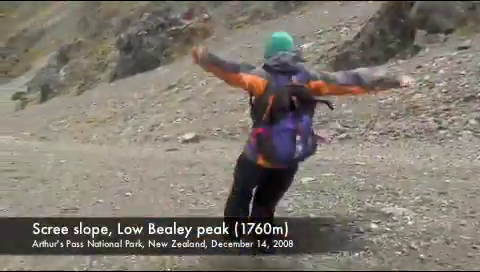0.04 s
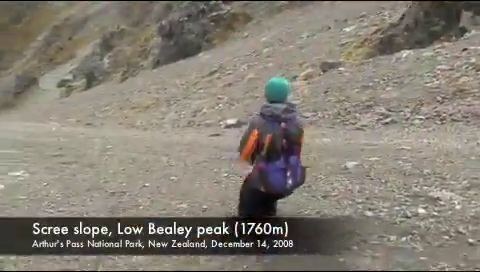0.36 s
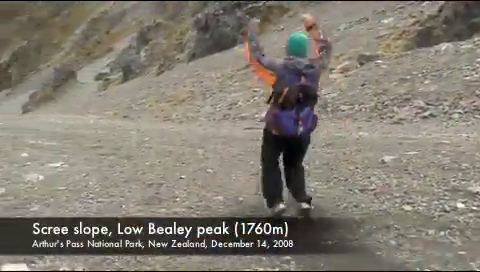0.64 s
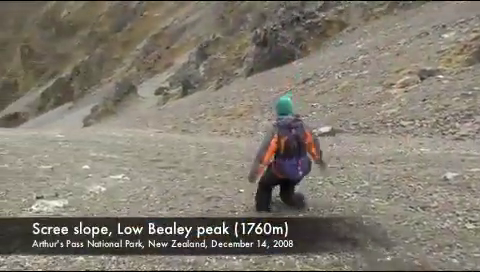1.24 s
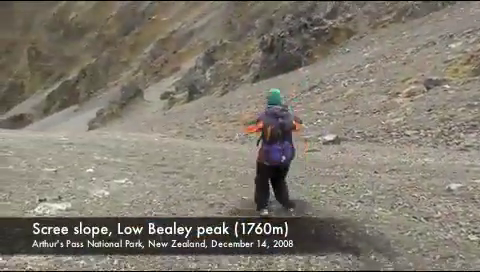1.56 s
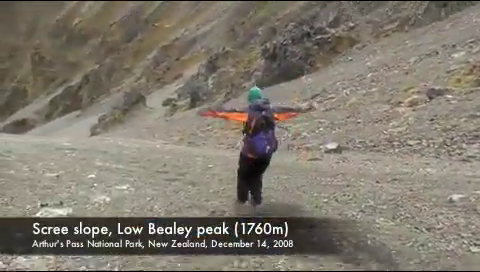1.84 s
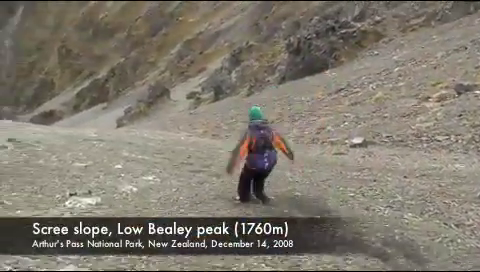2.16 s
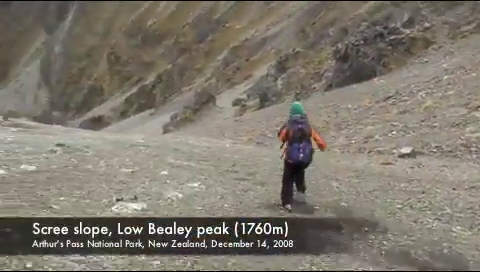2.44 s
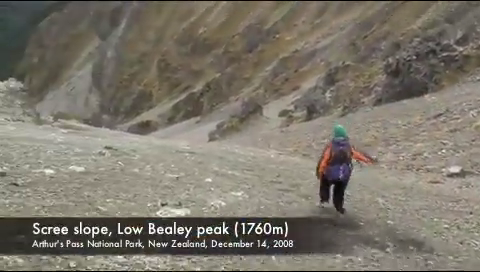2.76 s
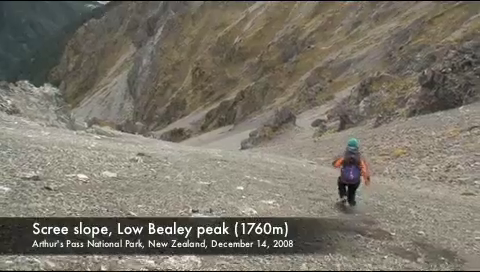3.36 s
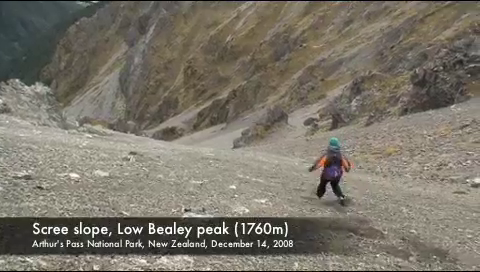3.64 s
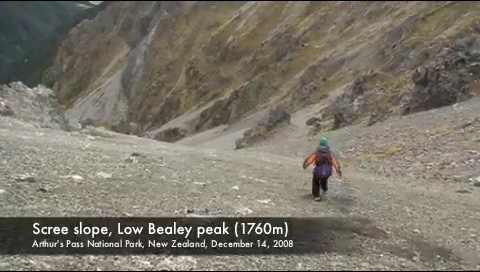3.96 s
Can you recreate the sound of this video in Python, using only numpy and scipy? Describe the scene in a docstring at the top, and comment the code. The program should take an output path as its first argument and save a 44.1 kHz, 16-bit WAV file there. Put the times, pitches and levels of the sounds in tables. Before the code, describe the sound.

Bounding footsteps crunching on loose scree, with trickling gravel and rumbling wind.

```python
"""A hiker's boots bound away down loose scree, heard from a hand-held camera in gusty wind.
Each landing excites countless damped stone vibrations, which sum to a crunch and a spray of chips.
Dislodged stones keep trickling as a hiss, and a few collide in single dry clacks.
Turbulent pressure rumbles and buffets the two microphone ports, the left one harder."""
import sys
import numpy as np
from scipy import signal
from scipy.fft import rfft, irfft
from scipy.io import wavfile

SR = 44100
rng = np.random.default_rng(int(sys.argv[2]) if len(sys.argv) > 2 else 0)


def unload_audio(sound):
    """Save the sound as a 16-bit wav file, at the path given as the first command line argument."""
    columns = np.transpose(np.atleast_2d(sound))
    # keep every value between -1 and 1, then stretch to whole-number steps
    steps = np.round(np.clip(columns, -1, 1) * 32767)
    wavfile.write(sys.argv[1], SR, steps.astype(np.int16))


N = 176400

# Wind pressure on the ports: t/s, relative level/dB
GUST_LEVEL = [(0, -30.5), (.67, -29), (.71, -22.5), (.82, -26), (.88, -22.5), (.99, -25), (1.08, -18.5),
              (1.27, -23.5), (1.6, -24.5), (2.05, -25), (2.11, -30), (2.28, -25), (2.48, -23),
              (2.62, -28.5), (2.8, -24), (2.98, -30.5), (3.05, -24.5), (3.14, -35), (3.25, -26), (3.4, -33),
              (3.65, -32), (3.72, -38.5), (3.8, -32.5), (4, -28.5)]
# Spectral density of the rumble: f/Hz, level/dB
RUMBLE_SPECTRUM = [(10, -27), (28, -7.5), (65, 1), (110, 0.5), (170, -6.5), (260, -15.5), (400, -34.5),
                   (700, -38), (2000, -58.5)]
# Strong eddies hit the left port: t/s, relative peak level/dB, half width/ms
BUFFETS = [(.066, -12.5, 1.3), (.755, -9, 1.4), (0.851, -21, 0.37), (0.9243, -13, 0.41),
           (0.991, -14.5, 0.5), (1.08, -7.5, 1.05), (1.138, -6.5, 1.14), (1.196, -8, 1.24),
           (1.415, -8, 0.98), (1.462, -6.5, 1.26), (1.562, -19, 0.23), (1.693, -15, 0.66),
           (1.854, -10, 0.97), (2.047, -12.5, 0.93), (2.272, -5, 1.67), (2.438, -24, 0.39),
           (2.4966, -1, 0.93), (2.756, -4.5, 1.84), (2.811, -8.5, 1.23), (3.039, -17, 0.82),
           (3.523, -23, 1.4), (3.779, -13.5, 3.1)]
# The largest eddies cover both ports at once: f/Hz, gain of the ports' difference/dB
PORT_DIFFERENCE = [(30, -6), (65, -10.5), (130, 1), (250, 0)]
# Small stones running down the slope: t/s, relative level/dB
TRICKLE_LEVEL = [(0, -34), (.18, -37), (.46, -36.5), (.85, -35.2), (1.15, -35), (1.32, -36), (1.45, -40.5),
                 (1.8, -37), (2.05, -40.5), (2.5, -41.5), (2.8, -40.3), (3.05, -43.5), (3.22, -40),
                 (3.5, -41.5), (4, -42)]
# Spectral density of the trickle: f/Hz, level/dB
TRICKLE_SPECTRUM = [(200, -14), (450, -4.5), (800, -2), (1300, -6.5), (2200, -5), (3300, -2), (5500, 2),
                    (9000, 2), (12300, 4), (14200, -3), (16000, -14)]
# Sheets of fine gravel let go: crest t/s, rise/s, fall/s, relative level/dB
SLIPS = [(.625, 0.13, 0.26, -34), (1.551, 0.086, 0.1, -37), (2.7, 0.038, 0.076, -44.5),
         (3.905, 0.055, 0.056, -36.5)]
# Single stones knock together: t/s, peak level/dB, f/Hz
CLACKS = [(0.0358, -17, 8950), (0.063, -18.5, 6240), (0.4652, -21, 6200), (0.5028, -20, 3840),
          (0.667, -19, 7900), (0.349, -18, 2650), (1.079, -19.5, 2930), (1.21, -14, 3870),
          (1.8568, -15.5, 3700), (1.858, -22, 6700), (2.137, -20.5, 5300), (2.259, -25.5, 1300),
          (2.486, -23.5, 5530), (2.838, -28, 1280), (3.301, -27, 2010), (3.354, -28, 3630),
          (3.6382, -21, 8250), (3.648, -22, 12000), (3.7505, -23, 9500), (3.7927, -21.5, 4360),
          (3.9252, -17.5, 3700)]
# Spectrum of one knock: f/pitch, level/dB
KNOCK_SPECTRUM = [(.1, -28), (.35, -5), (.6, -1.5), (1, 4.5), (1.4, 3), (2.3, -6), (4, -6)]
# Boot landings: t/s, rise/s, slide/s, crunch level/dB, spray level/dB, crunch f/Hz, heel bite f/Hz
LANDINGS = [(-.03, .02, 0.11, -47, -54, 800, 1500), (0.249, 0.013, 0.21, -32.5, -27.5, 780, 755),
            (1.195, 0.017, 0.17, -33.5, -27, 826, 1730), (2.072, 0.048, 0.22, -38, -38.5, 810, 1510),
            (2.809, 0.015, 0.15, -43, -57, 940, 1300), (3.12, 0.091, 0.17, -40, -59, 940, 1300),
            (3.432, 0.098, 0.24, -42, -62, 855, 1100), (3.823, 0.027, 0.41, -45, -41.5, 910, 1500)]
# Spectral density of gravel under the boot: f/pitch, level/dB
CRUNCH_SPECTRUM = [(.13, -28), (.38, -15), (.56, -7), (.78, -2.5), (1, 0.5), (1.45, -4.5), (2.1, -10.5),
                   (3.2, -11.5), (6, -17), (18, -42)]
# Spectral density of the thrown chips: f/Hz, level/dB
SPRAY_SPECTRUM = [(300, 0), (1500, 5), (4500, 14), (8000, 16), (12300, 15), (14200, 4), (16000, -6)]
# A boot drags and the stones rasp: t/s, duration/s, level/dB, f/Hz
SCRAPES = [(0.473, 0.069, -42, 1660)]
# The left port is shaded from the stones: f/Hz, gain/dB
LEFT_SHADE = [(700, -9), (2000, -4), (4500, -6.5), (8000, -7), (10000, -3), (12500, -8)]

FIZZ_HZ, FIZZ_DB, FIZZ_LOSS_DB_PER_S = 9900, 1, 2.5  # the top of the hiss fades as the hiker draws away
KNOCK_DECAY_S, RING_DECAY_S, RING_DB = 0.00072, 0.019, -21.5
RINGING_BELOW_HZ = 2300  # stones pitched lower are larger and ring longer
CRUNCH_SAG_DB, CRUNCH_RELEASE_S = 5.5, 0.063
SPRAY_HOLD_S, SPRAY_RELEASE_S = 0.016, 0.041
BITE_DB, BITE_Q, BITE_RELEASE_S = -7, 1.9, 0.09  # level relative to the spray


def amp(db):
    """Amplitude ratio of a level in decibels."""
    return 10 ** (np.asarray(db) / 20)


def unit_rms(x):
    """Normalisation to unit mean power."""
    return x / np.sqrt(np.mean(x ** 2) + 1e-20)


def curve(points):
    """Linear interpolation of a time table at every sample."""
    return np.interp(np.arange(N) / SR, *np.transpose(points))


def colour(x, spectrum, pitch=1):
    """Zero-phase filtering by a table of levels over log frequency; pitch scales its frequencies."""
    hz, db = np.transpose(spectrum)
    bins = np.fft.rfftfreq(x.shape[-1], 1 / SR)
    gain = amp(np.interp(np.log(bins + 1), np.log(pitch * hz + 1), db))
    return irfft(rfft(x) * gain)


def wander(rate_hz):
    """Random modulation: low-passed Gaussian noise of unit rms."""
    lowpass = np.exp(-(np.fft.rfftfreq(N, 1 / SR) / rate_hz) ** 2)
    return unit_rms(irfft(rfft(rng.standard_normal(N)) * lowpass, N))


def add(mix, start, sound):
    """Superposition of a sound on the mix from a start time in seconds."""
    part = mix[:, max(round(start * SR), 0):][:, :sound.shape[-1]]
    part += sound[..., :part.shape[1]]


def envelope(start, rise, hold, release, sag_db=0):
    """Linear rise, a hold that may sag, then exponential decay; times in seconds."""
    t = np.maximum(np.arange(N) / SR - start, 0)
    held = np.minimum(t / rise, 1) * amp(-sag_db * np.minimum(t / hold, 1))
    return held * np.exp(-np.maximum(t - hold, 0) / release)


def eddy(width_ms, rebound_ratio=3.12):
    """A vortex's pressure pulse has zero mean: sharp suction balanced by a wider rebound on both sides."""
    u = np.arange(-1024, 1024) / SR * 1000 / width_ms
    suction, rebound = (1 + np.array([u, u / rebound_ratio]) ** 2) ** -1.5
    pulse = rebound / rebound.sum() - suction / suction.sum()
    return pulse / abs(pulse).max()


def wind():
    """Turbulent pressure at the ports: a low rumble, a fitful flutter of small eddies and hard buffets."""
    gust_db = curve(GUST_LEVEL)
    out = unit_rms(colour(rng.standard_normal((2, N)), RUMBLE_SPECTRUM)) * amp(gust_db + 3.0)
    flutter_db = np.minimum(gust_db + 1.17 * (gust_db + 25.0), -20.5)  # outgrows the gust, up to a cap
    for width_ms, per_s, left_db, right_db in [(1.286, 310, -0.5, -7.0), (0.41, 120, -19, -26.0)]:
        arrivals = (rng.random((2, N)) < per_s / SR) * rng.uniform(-1.08, 1, (2, N))
        pulses = signal.oaconvolve(arrivals, eddy(width_ms)[None], "same", axes=1)
        flutter = unit_rms(pulses * amp(1.54 * wander(22)))
        out += flutter * amp([[left_db], [right_db]]) * amp(flutter_db)
    for s, db, width_ms in BUFFETS:
        pulse = eddy(width_ms)
        add(out, s - len(pulse) / 2 / SR, pulse * amp(db) * amp([[0], [-15]]))
    mid = out.mean(0)
    side = colour((out[0] - out[1]) / 2, PORT_DIFFERENCE)
    return np.array([mid + side, mid - side])


def gravel(per_s, spread_db, cycles, scatter, modes=30):
    """Shot noise: random stone contacts ring as damped modes, with a phase difference between the ports."""
    out, t = np.zeros((2, N)), np.arange(1024) / SR
    for hz in np.geomspace(350, 15000, modes):
        weight = np.sqrt(hz / 4000)  # higher modes are struck more often and carry more power
        at = np.flatnonzero(rng.random(N) < per_s * weight / modes / SR)
        strength = amp(spread_db * np.minimum(rng.standard_exponential(N)[at], 4.5))
        port_shift = scatter * rng.uniform(-np.pi, np.pi, N)[at]
        phase = rng.uniform(0, 2 * np.pi, N)[at]
        ring = np.exp((2j * np.pi - 2 / cycles) * hz * t).astype(np.complex64)
        hits = np.zeros((2, N), np.complex64)
        hits[:, at] = strength * np.exp(1j * np.array([phase, phase + port_shift]))
        out += weight * unit_rms(signal.oaconvolve(hits, ring[None], axes=1)[:, :N].real)
    return out


def trickle():
    """Dense impacts fuse into hiss and sparse ones tick; fresh slips add in power and stay bright."""
    hiss = unit_rms(colour(gravel(per_s=24000, spread_db=1.5, cycles=4, scatter=0.68), TRICKLE_SPECTRUM))
    ticks = unit_rms(colour(gravel(per_s=900, spread_db=4.0, cycles=4.5, scatter=0.18), TRICKLE_SPECTRUM))
    t, running = np.arange(N) / SR, amp(curve(TRICKLE_LEVEL))
    slipping = sum(amp(db) * np.exp(-abs(t - s) / np.where(t < s, rise, fall))
                   for s, rise, fall, db in SLIPS)
    stones = hiss * amp(-1.13 + 1.04 * wander(12.4)) + amp(-8.5) * ticks
    body = signal.lfilter(*signal.butter(1, FIZZ_HZ, fs=SR), stones)
    fizz_gain = running * amp(FIZZ_DB - FIZZ_LOSS_DB_PER_S * t)
    return np.hypot(running, slipping) * body + np.hypot(fizz_gain, slipping) * (stones - body)


def clacks():
    """Impact transients: a noise burst about the stone's pitch decays fast, leaving a faint short tail."""
    out, t = np.zeros((2, N)), np.arange(2048) / SR
    attack = 1 - np.exp(-t / 0.00018)
    tail = amp(RING_DB) * np.exp(-t / RING_DECAY_S)
    for s, db, hz in CLACKS:
        shared, left, right = rng.standard_normal((3, len(t)))
        grit = shared + 0.22 * np.array([left, right])
        decay_s = KNOCK_DECAY_S * max(1, RINGING_BELOW_HZ / hz) ** 2
        knock = colour(grit, KNOCK_SPECTRUM, hz) * attack * (np.exp(-t / decay_s) + tail)
        add(out, s, amp(db) * knock / abs(knock).max())
    return out


def footsteps():
    """Impact and friction: the heel bites and throws chips; the sole grinds stones, pitched by size."""
    coarse = gravel(per_s=17000, spread_db=2.5, cycles=6.8, scatter=0.59) * amp(0.78 * wander(65))
    fine = gravel(per_s=18000, spread_db=1.5, cycles=3.5, scatter=0.96)
    spray = unit_rms(colour(fine, SPRAY_SPECTRUM))
    out = np.zeros((2, N))
    for s, rise, slide, crunch_db, spray_db, crunch_hz, bite_hz in LANDINGS:
        crunch = unit_rms(colour(coarse, CRUNCH_SPECTRUM, crunch_hz))
        bite = unit_rms(signal.lfilter(*signal.iirpeak(bite_hz, BITE_Q, SR), coarse[:, ::-1]))
        out += amp(crunch_db) * envelope(s, rise, slide, CRUNCH_RELEASE_S, CRUNCH_SAG_DB) * crunch
        out += amp(spray_db) * envelope(s, rise, SPRAY_HOLD_S, SPRAY_RELEASE_S) * spray
        out += amp(spray_db + BITE_DB) * envelope(s, rise, SPRAY_HOLD_S, BITE_RELEASE_S) * bite
    for s, duration, db, hz in SCRAPES:
        rasp = unit_rms(signal.lfilter(*signal.iirpeak(hz, Q=6, fs=SR), fine))
        out += amp(db) * envelope(s, rise=0.01, hold=duration, release=0.017) * rasp
    return out


def scene():
    """Acoustic shadowing of the left port sets the stones to the right; wind acts on both ports."""
    left, right = footsteps() + trickle() + clacks()
    return np.array([colour(left, LEFT_SHADE), right]) + wind()


def record(dry):
    """Band limiting: the camera acts as a linear-phase low-pass filter."""
    lowpass = signal.firwin(511, cutoff=15900, window=("kaiser", 9), fs=SR)
    return signal.oaconvolve(dry, lowpass[None], "same")


dry = scene()
out = record(dry)
unload_audio(out)
```